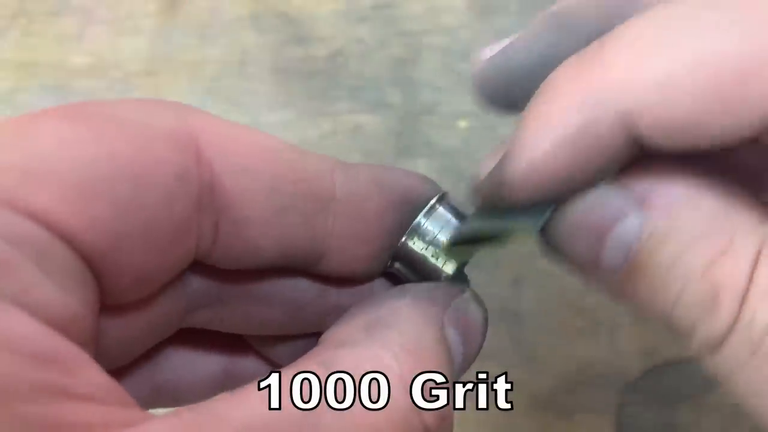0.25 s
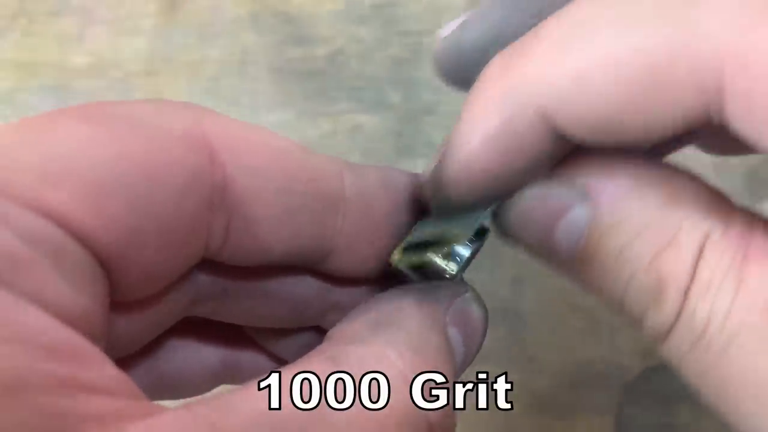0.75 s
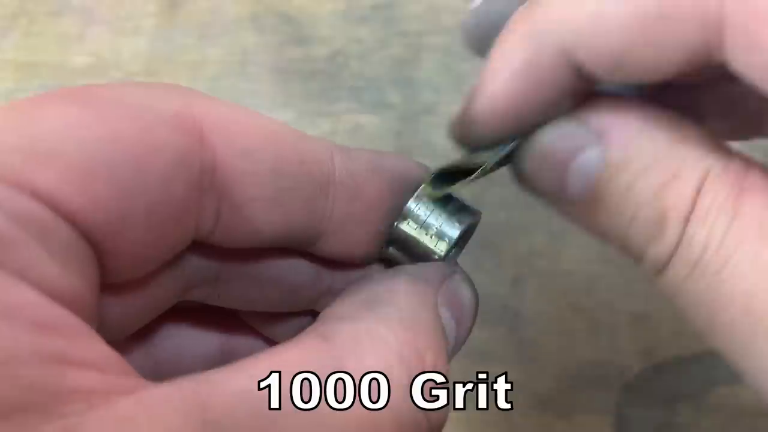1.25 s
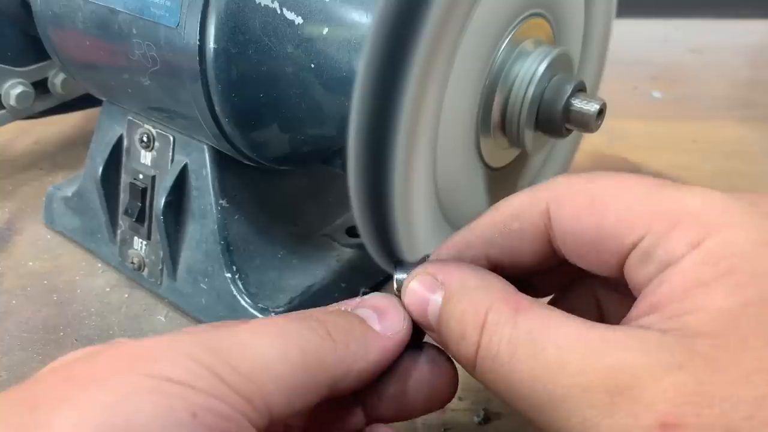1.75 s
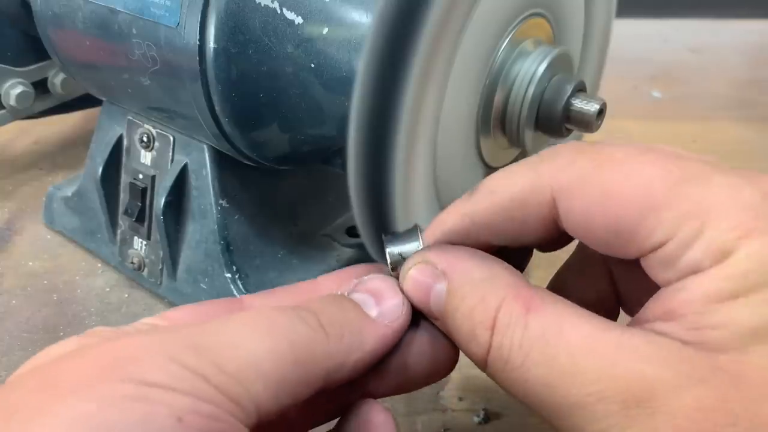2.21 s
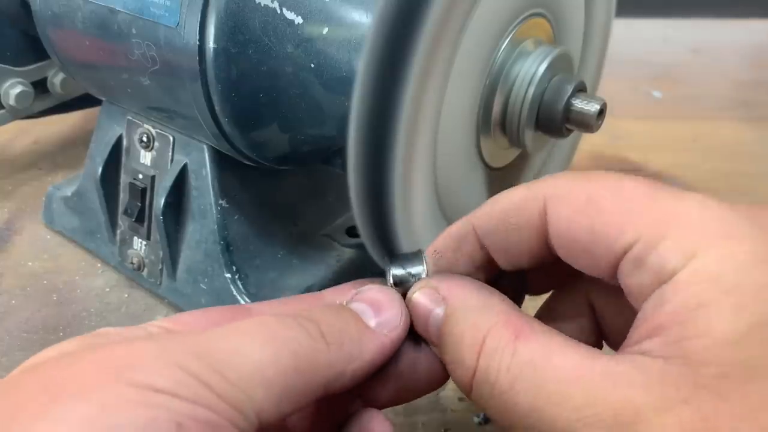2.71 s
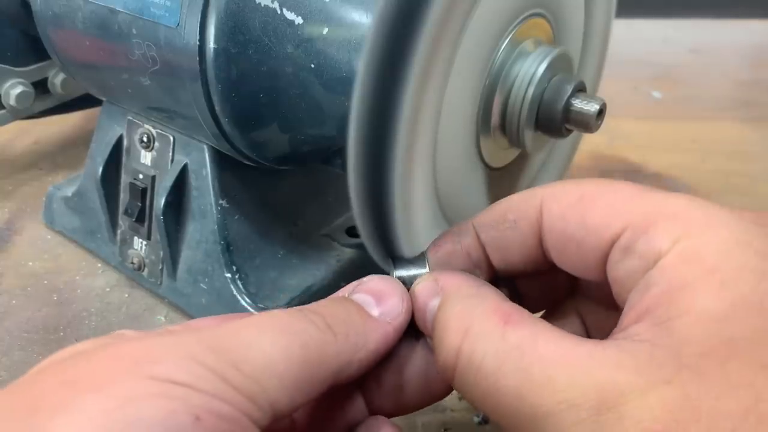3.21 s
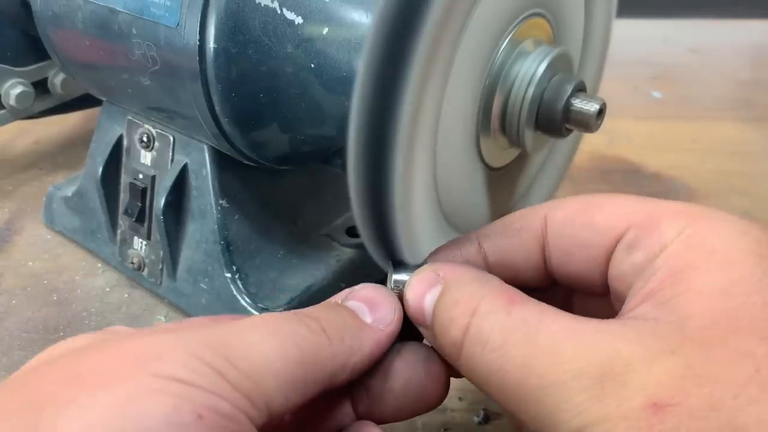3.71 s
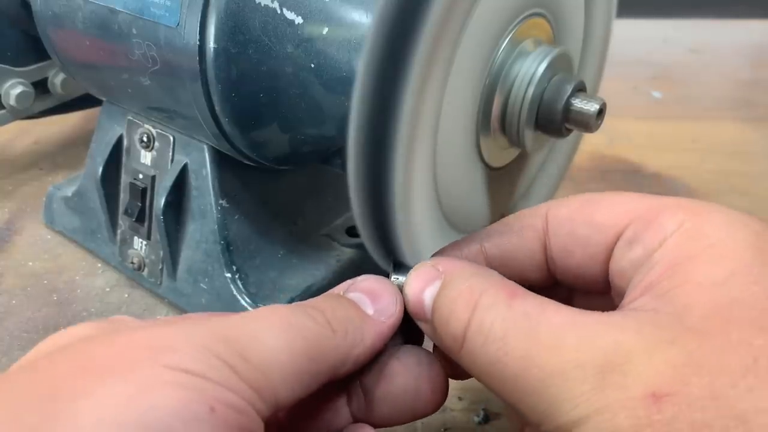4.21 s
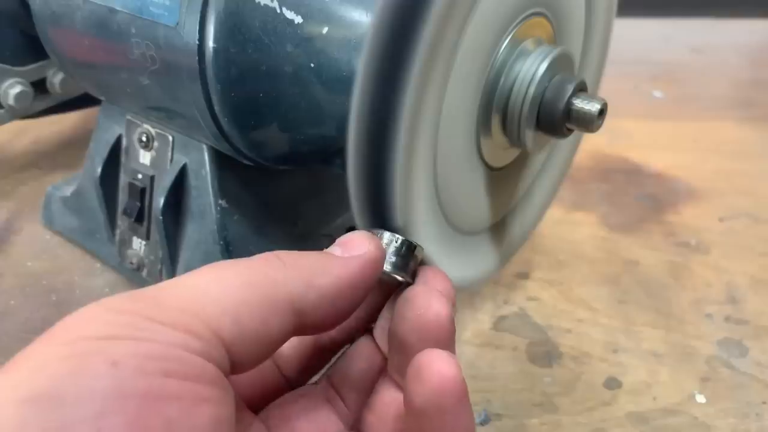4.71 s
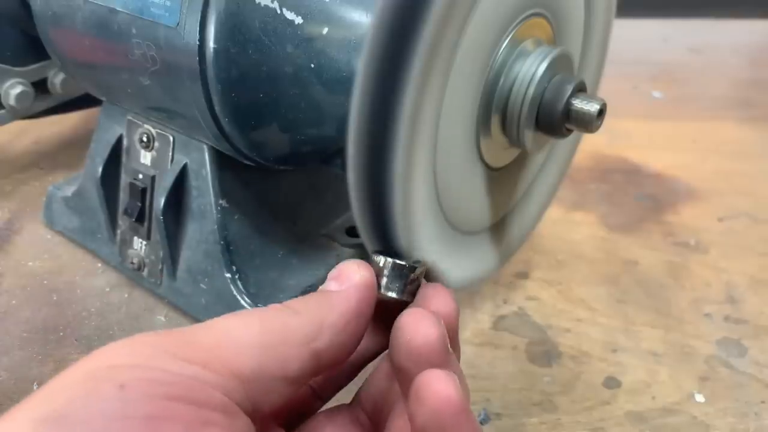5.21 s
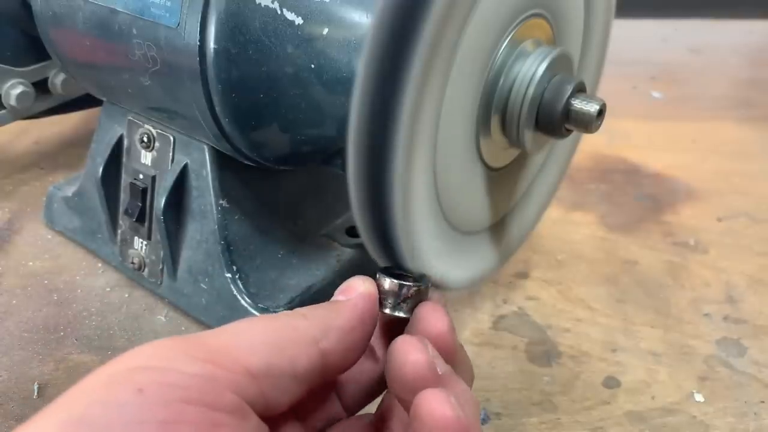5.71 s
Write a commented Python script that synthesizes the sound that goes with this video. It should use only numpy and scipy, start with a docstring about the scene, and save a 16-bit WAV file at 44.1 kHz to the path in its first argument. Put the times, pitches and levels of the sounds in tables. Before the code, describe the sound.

About fourteen short gritty rasps, seven or so back-and-forth pairs, are heard very close, with tiny gaps between them. Then, suddenly, a polishing wheel is running at full speed, with low drone, buzzing whine and rough airy friction of metal on cloth. The rubbing dips briefly, recovers, then jumps at a second cut and gradually lightens while the motor keeps humming. Stereo, close and dry, no speech.

```python
"""First a small steel ring is rubbed with fine sandpaper in quick strokes, shaped grit noise over a throbbing hum.
Then, in two passages, it is pressed against the cloth wheel of a running bench grinder: noise that nearly
repeats on every turn makes the rub and whirr, and shaft-locked sines the whine.
The motor adds shaft and mains tones, and slows under load. Two microphone ports hear it all with a phase between."""
import sys
import numpy as np
from scipy import signal
from scipy.fft import rfft, irfft
from scipy.io import wavfile
from scipy.ndimage import uniform_filter1d, map_coordinates

SR = 44100
rng = np.random.default_rng(int(sys.argv[2]) if len(sys.argv) > 2 else 0)


def unload_wav(signal):
    """Save mono or channel-first audio to the path in sys.argv[1] as 16-bit WAV at rate SR, clipped to [-1, 1]."""
    wavfile.write(
        sys.argv[1],
        SR,
        np.round(np.clip(np.atleast_2d(signal).T, -1, 1) * 32767).astype(np.int16),
    )


N = 262395
TIME, HZ = np.arange(N) / SR, np.maximum(np.fft.rfftfreq(N, 1 / SR), 1)

# Onsets of the two grinder passages: start_s
GRINDER_STARTS = [1.539, 4.623]
# Pressing of ring on wheel, per passage: time_s, rub_level_db (before a fixed trim of -2.5 dB)
CONTACT = [
    [(1.54, -41), (1.7, -35.5), (2.1, -34), (2.3, -35.5), (2.4, -39.5), (2.52, -48), (2.6, -42.5),
     (2.68, -46), (2.76, -41.5), (2.9, -39), (3.2, -36.5), (3.45, -36), (3.6, -36.5), (3.75, -35.5),
     (3.95, -36), (4.22, -34), (4.42, -36), (4.52, -37.5), (4.62, -52.5)],
    [(4.63, -33.5), (4.86, -31.5), (4.99, -34), (5.23, -33), (5.62, -36.5), (5.75, -35.5), (5.85, -38),
     (5.95, -38)],
]
# Drifting colour of the rub, per passage: time_s, low_lift_db, high_lift_db
RUB_TILT = [
    [(1.54, 6.5, 5), (1.8, -1, 1.5), (2.6, 6, 4), (3.1, 4, 2), (3.6, 2, 2), (4.3, -0.5, 2), (4.62, 6, 4)],
    [(4.63, 6, 2.5), (5.25, 4, 4), (5.6, -1, -1), (5.95, -8, -0.5)],
]
# Wheel speed, lower under load, per passage: time_s, turns_per_s
SPEED = [
    [(1.66, 59.33), (1.81, 59.04), (1.96, 58.92), (2.11, 58.87), (2.26, 59.05), (2.41, 59.23),
     (2.56, 59.32), (2.71, 59.38), (2.86, 59.47), (3.01, 59.38), (3.16, 59.24), (3.31, 59.11),
     (3.46, 58.98), (3.61, 59.03), (3.76, 59.0), (3.91, 58.75), (4.06, 58.68), (4.21, 58.76), (4.36, 58.78),
     (4.51, 58.86)],
    [(4.74, 59.29), (4.84, 59.26), (4.94, 59.29), (5.04, 59.36), (5.14, 59.23), (5.24, 59.15), (5.34, 59.2),
     (5.44, 59.26), (5.54, 59.35), (5.64, 59.4), (5.74, 59.38), (5.84, 59.44)],
]
# Sound that comes round again on the next turn: frequency_hz, share (0-1)
REPEATS = [(300, 0.073), (1000, 0.57), (2500, 0.66), (5000, 0.71), (7000, 0.77), (9500, 0.84),
           (15000, 0.16)]
# Lasting unevenness of the rim, per passage: order (multiple of the turn rate), then level_db (rms a side) in
# each of three grips, left_lead_rad, left_minus_right_db
WHINE = [
    [(15, -64, -65, -57, 0.1, 6), (16, -52, -52, -52, 0.1, 2), (17, -58, -58, -53, 0.6, 5),
     (18, -58, -55, -53, 1.2, 3), (23, -56, -55, -52, 0.8, 1), (26, -65, -60, -57, 0.9, 5),
     (27, -56, -58, -57, 0.4, 7), (29, -61, -57, -55, 0.5, 2), (30, -62, -62, -58, -0.0, 0),
     (31, -54, -53, -48, 0.8, 1), (33, -52, -54, -56, 0.4, -2), (36, -51, -51, -50, 1.5, 2),
     (37, -51, -52, -57, 0.8, -2), (38, -55, -55, -60, 1.1, -2), (39, -52, -55, -61, 0.8, -1),
     (40, -50, -54, -49, 2.8, -3), (47, -48, -51, -51, -3.0, 3), (49, -51, -49, -52, 2.5, 0),
     (51, -47, -51, -49, 1.4, 2), (52, -47, -51, -47, 1.7, 0), (54, -53, -57, -49, 1.8, -1),
     (58, -48, -48, -49, -2.6, -1), (59, -58, -62, -54, 0.0, 0), (61, -54, -54, -51, -2.1, -1),
     (62, -52, -55, -54, -2.0, 0), (70, -59, -60, -51, -0.8, 3), (72, -65, -61, -51, -1.7, -2),
     (79, -51, -52, -58, -1.6, -3), (93, -53, -55, -61, -0.9, -1), (95, -50, -53, -53, -2.0, 0),
     (108, -58, -58, -54, -0.3, 3), (115, -55, -64, -52, 0.1, -5), (116, -52, -62, -62, 0.1, -3),
     (118, -53, -54, -54, -0.8, -1)],
    [(23, -53, -54, -55, 0.3, 5), (27, -63, -56, -58, 0.0, 8), (29, -57, -59, -61, -0.1, 6),
     (31, -57, -56, -61, 0.9, 6), (50, -52, -54, -57, -0.1, 2), (59, -53, -55, -53, -0.1, -1),
     (60, -53, -54, -51, -0.1, 0), (62, -53, -54, -55, -0.3, 0), (69, -57, -53, -64, 0.1, -1),
     (70, -52, -54, -56, 0.9, -3), (73, -49, -50, -64, 1.2, -1), (77, -54, -54, -54, 0.9, -3),
     (94, -58, -60, -56, 0.6, -12), (95, -51, -57, -57, 1.5, -12), (102, -57, -55, -58, 1.2, -14),
     (105, -49, -58, -60, 2.0, -5), (106, -52, -50, -52, 2.0, -6), (107, -45, -54, -55, 1.7, -2),
     (109, -45, -52, -51, 1.4, -3), (110, -46, -53, -57, 1.4, -4), (111, -47, -51, -59, 1.5, -2),
     (113, -51, -55, -54, 1.5, 1), (114, -48, -57, -48, 1.3, 1), (115, -44, -45, -51, 1.2, -1),
     (116, -48, -49, -49, 0.8, 0), (119, -51, -53, -51, 1.2, 9), (122, -55, -60, -60, -0.0, 9),
     (125, -51, -52, -53, -1.1, 5), (129, -49, -50, -55, -1.3, 0), (132, -59, -49, -58, -1.7, 3)],
]
# Middles of the three grips, per passage: time_s
GRIPS = [(2.0, 3.3, 4.1), (4.83, 5.27, 5.74)]
# Tones tied to the shaft: order (multiple of the turn rate), passage_1_db (rms), passage_2_db (rms);
# orders above 3 have these levels at the rub level LOAD_AT_DB
SHAFT = [(1, -32.6, -32.4), (2, -48, -50), (2.63, -49.5, -49.5), (3, -51, -49.5), (4, -51, -57),
         (5, -62, -68), (6, -61, -66), (9, -62, -62)]
# Magnetic hum at multiples of the mains: frequency_hz, passage_1_db (rms), passage_2_db (rms)
MAINS = [(120, -47, -45), (240, -53, -58), (360, -66, -68), (480, -57.5, -46), (600, -54, -54),
         (840, -64, -66)]
# Sandpaper strokes, pull and push in turn: start_s, length_s, bite_level_db, low_lift_db, end_swell_db
STROKES = [(0, 0.05, -48, -6, -1), (0.057, 0.093, -45.5, 2.5, 3), (0.163, .1, -49.5, 2.5, 3),
           (0.283, 0.097, -43.5, 3, -3), (0.398, 0.081, -47.5, 2, 1.5), (0.491, 0.1, -44, -1, 0),
           (0.619, 0.075, -48, 0.5, 3), (0.722, 0.085, -46, 4, 2.5), (0.837, 0.078, -48, 1, 2.5),
           (0.944, 0.092, -46, 1, 1), (1.065, 0.079, -46, -0.5, 0), (1.17, 0.085, -45, 1, 1),
           (1.28, 0.084, -48, -1.5, 1), (1.389, 0.091, -46.5, 0.5, 3.5), (1.512, 0.04, -47.5, 3.5, -1)]
# Paper brushing the ring before some strokes: start_s, level_db (it climbs from 11 dB below to 1 dB above)
BRUSHES = [(.268, -71), (.48, -62), (.594, -64), (.927, -66), (1.158, -60)]
# Resonances of ring, fingers and paper, for sanding and each grinder passage: frequency_hz, width_hz, lift_db
RINGING = [
    [(3200, 400, 3), (3620, 120, -4), (4150, 300, 4), (4600, 200, -6), (5000, 300, 2), (5600, 200, -4),
     (6100, 300, 2), (7500, 500, 3), (10100, 500, 3), (12500, 500, 3)],
    [(1360, 80, 1), (1820, 150, 2), (2150, 200, 2), (2600, 400, 2), (3550, 200, 2), (4150, 250, 3),
     (7250, 250, 3), (9300, 300, 2), (12700, 400, 2), (15200, 900, 4)],
    [(1360, 80, 4), (1850, 200, 3), (2650, 400, 3), (3530, 200, 4), (6400, 300, 2), (6830, 200, 3),
     (7400, 300, 3), (9200, 400, 3), (15200, 900, 4)],
]
# Phase between the ports, for sanding and each grinder passage: frequency_hz, left_lead_rad
PORTS = [
    [(0, 0), (1600, 1.2), (3600, 1.6), (4000, 0), (4400, -.7), (5000, 1.5), (5500, -1.2), (6000, 1),
     (7000, .7), (8600, -3.14), (16000, -17.67)],
    [(0, 0), (350, 0), (550, 1.1), (950, .4), (2150, 1.3), (2400, 2.9), (2900, 2.8), (3050, 1.6), (3300, 2),
     (3450, 3.7), (4000, 4.2), (5500, 4.3), (6500, 6), (7100, 6), (8600, 3.14), (16000, -11.39)],
    [(0, 0), (350, 0), (600, .3), (1550, .5), (1900, 1.4), (2350, 1.9), (2600, 3.1), (2750, 2.7), (2950, 0),
     (3650, -.2), (4200, .6), (5200, 2), (6200, 1.5), (7000, 1), (7400, -.7), (8600, -3.14),
     (16000, -17.67)],
]
# Colour and stereo image of each source (the rub has one per passage): frequency_hz,
# density_db (per Hz, relative), left_right_likeness (0-1), left_minus_right_db
RUB_COLOUR = [
    [(280, -5, 0.84, 0), (650, -6.5, 0.45, 5.5), (970, -1.5, 0.81, 0.5), (1480, -6.5, 0.35, -1),
     (2140, -4, 0.61, 3), (3050, 2.5, 0.47, -0.5), (4400, -2, 0.27, 0.5), (5170, 1.5, 0.1, -1),
     (5670, -1.5, 0.27, -1), (6200, -0.5, 0.27, -1), (8400, 0.5, 0.95, 1), (10140, -4, 1, -1.5),
     (14100, -2, 1, 0.5), (16100, -22.5, 1, -4.5)],
    [(300, -11, 0.8, 8), (670, -10, 0.69, 4), (970, -12, 0.62, -3), (1530, -8, 0.45, 4),
     (2230, -6.5, 0.94, 1.5), (3080, -3.5, 0.57, 2), (4120, -2, 0.96, -1), (5100, 2.5, 0.46, -0.5),
     (6100, 4, 0.68, -6), (7340, 1, 0.65, 3), (8580, 6, 1, -0.5), (10700, -6.5, 1, -0.5),
     (13100, -2.5, 1, 0), (15600, -8, 1, 0)],
]
WHIRR_COLOUR = [(302, -14, 0.9, 5), (724, 1, 0.41, 2), (1040, -1.5, 0.7, 12), (1330, 0, 0.4, 1.5),
                (1920, 0.5, 0.41, 4), (2380, -0.5, 0.37, -1), (3080, -11, 0.91, 6), (3540, 1.5, 0.25, 4),
                (3970, 0, 0.1, 4), (4960, -0.5, 0.18, -3), (5730, -8, 0.2, 1), (7100, -11, 0.45, 4),
                (9000, -11.5, 0.72, 8), (10400, 1, 1, 2), (12960, 1, 1, -1), (15000, -16, 1, -1)]
RUMBLE_COLOUR = [(45, -9, 0.82, 0), (113, -9, 0.71, -1), (400, -21, 0.86, 1), (920, -27.5, 0.84, 0.75)]
SANDING_COLOUR = [(706, -11.5, 0.7, 3), (1510, -20.5, 0.9, 5), (2000, -14.5, 0, 8), (3200, -2.5, 0.7, -1.5),
                  (4130, -4, 0.86, -0.5), (5200, -5, 0, -1.5), (6200, -2.5, 0.4, -1), (7800, -2.5, 0.26, 1),
                  (8500, 1.5, 0.87, 0.5), (10900, 1, 0.94, 0.5), (11800, 0, 1, -1), (13800, -3.5, 1, 0),
                  (16200, 3, 1, 0.5)]
ROOM_COLOUR = [(25, -18, .95, -6), (45.3, -13, 0.87, 12), (62, -12, 0.61, 0), (72, -12.5, 0.83, 0),
               (123, -13.5, 0.78, -5), (137, -25, 1, 6), (250, -32, 0.78, -2), (393, -34.5, .7, 0),
               (590, -43, 0.37, 2), (1000, -42.5, 0.61, 5), (1600, -47, 0.59, 3), (5000, -46.5, .4, 1),
               (15000, -42, .8, 6)]

WHIRR_DB, RUMBLE_DB, ROOM_DB = -45.5, -47, -61.5
SECTIONS = 4   # stitched sections of the cloth wheel
FIBRES = 746   # points round the rim
# level of the whine against the rub: dB per dB, reached at this multiple of the turn rate
WHINE_FOLLOWS, FULL_ORDER = 1.3, 31
# higher multiples bunch later, in turns per multiple; random phase, in cycles
BUNCH_LAG, WHINE_SCATTER = .011, .55
# upper shaft tones grow with the rub: dB per dB, from this rub level
LOAD_FOLLOWS, LOAD_AT_DB = 0.7, -34
# mains tone shifted up by the turn rate; dB rms per passage, at the rub level LOAD_AT_DB
SIDEBAND_HZ, SIDEBAND_DB = 480, (-55, -53.5)
PULL_RISE_S, PUSH_RISE_S, BRUSH_RISE_S = 0.015, 0.0031, 0.0027
PULL_LEAD_S, PUSH_LEAD_S, STOP_S = 0.016, .002, 0.0082
REST_DB = -80
# level mid-stroke and near its end against the bite, in dB, before the stroke's own swell
PULL_SAG_DB, PUSH_SAG_DB = (1.5, -2.5), (-2, -5)
THROB_HZ, THROB_PEAK_S = 4.04, 0.433
CUTOFF_HZ = 15710


def grinder(passage):
    """Superposition: rub, whine, whirr, rumble and motor add, most of them sharing one shaft angle."""
    rub_db, = in_time(CONTACT[passage])
    turns = np.cumsum(in_time(SPEED[passage])[0]) / SR
    rub = wheel_rub(turns, rub_db, passage)
    idle = whirr(turns) + rumble()
    return rub + idle + motor(turns, rub_db, passage) + whine(turns, rub_db, passage)


def wheel_rub(turns, rub_db, passage):
    """Friction excitation: the passing rim drives the resonances of the held ring."""
    low_db, high_db = in_time(RUB_TILT[passage])
    lasting = [int(row[0]) for row in WHINE[passage]]
    rub = rim(turns, memory=0.96, seam_db=0.3, lasting=lasting)
    rub = resonant(rub, RINGING[passage + 1], patchy_db=1.5, patch_s=0.57)
    rub = heard(rub, RUB_COLOUR[passage], PORTS[passage + 1])
    rub = lifted(rub, low_db, high_db, low_hz=2230, high_hz=7500)
    return from_db(rub_db - 2.5 + 0.99 * drift(5)) * rub


def rim(turns, memory, seam_db, lasting=()):
    """Cyclic repetition: cloth fibres pass once a turn, changing a little each time; fresh hiss fills the rest."""
    fibres = rng.standard_normal((2, int(turns[-1]) + 42, FIBRES))
    keep = np.clip(memory, 0, .99)
    fibres = signal.lfilter([np.sqrt(1 - keep ** 2)], [1, -keep], fibres, axis=1)
    fibres = fibres[:, 40:]   # drop the turns in which the memory settles
    orders = rfft(fibres)
    orders[..., list(lasting)] = 0   # these multiples sound as the whine
    fibres = irfft(orders, FIBRES).reshape(2, -1)
    fine = signal.resample_poly(fibres, 2, 1, axis=1)
    passing = [map_coordinates(side, [turns * FIBRES * 2], order=3) for side in fine]
    share = np.clip(in_hz(REPEATS)[0], 0, 1)
    repeated = np.sqrt(share) * rfft(passing)
    fresh = np.sqrt(1 - share) * rfft(rng.standard_normal((2, N)))
    rub = irfft(repeated + fresh, N)
    # out of true, the wheel bears harder once and twice a turn, and at each stitched section
    runout = np.cos(2 * np.pi * turns) + 0.38 * np.cos(4 * np.pi * turns + 1)
    runout = runout + 1.4 * np.cos(2 * np.pi * SECTIONS * turns)
    return rub * from_db(seam_db * runout)


def whine(turns, rub_db, passage):
    """Harmonic series of rotation: neighbouring multiples bunch once a turn and rattle; grip shifts their balance."""
    out, side, time = 0, np.array([[.5], [-.5]]), TIME[::16]   # levels move on every 16th sample
    wavers = [drift(2.0)[::16] for _ in range(6)]
    grips_s = GRIPS[passage]
    # rub level against its course between the grips
    pressed_db = rub_db[::16] - np.interp(time, grips_s, np.interp(grips_s, TIME, rub_db))
    for order, *grip_db, lead, lean_db in WHINE[passage]:
        db = np.interp(time, grips_s, grip_db) + .7 * rng.standard_normal(6) @ wavers
        db = db + WHINE_FOLLOWS * min(order / FULL_ORDER, 1) * pressed_db
        cycles = order * (turns - BUNCH_LAG * order / 2) + WHINE_SCATTER * rng.random()
        wave = np.sin(2 * np.pi * cycles + lead * side)
        out = out + from_db(lean_db * side) * np.repeat(from_db(db), 16)[:N] * wave
    return np.sqrt(2) * out


def motor(turns, rub_db, passage):
    """Forced vibration: unbalance and bearings follow the shaft, upper tones the load; magnetic hum keeps to the mains."""
    load_db = LOAD_FOLLOWS * (rub_db - LOAD_AT_DB)
    # each tone: cycles, level in dB rms, waver in dB
    tones = [(turns * order, db[passage] + load_db * (order > 3), 1.4 if order > 1 else .4)
             for order, *db in SHAFT]
    tones += [(TIME * hz, db[passage], .6) for hz, *db in MAINS]
    tones += [(TIME * SIDEBAND_HZ + turns, SIDEBAND_DB[passage] + load_db / 2, 2.4)]
    out = 0
    for cycles, db, waver_db in tones:
        mean_hz = cycles[-1] / TIME[-1]
        # radians each side of the middle
        lead = 0.13 + np.interp(mean_hz, *np.transpose(PORTS[passage + 1])) / 2
        wave = np.sin(2 * np.pi * (cycles + rng.random()) + lead * np.array([[1], [-1]]))
        out = out + from_db(db + waver_db * drift(8.5)) * wave
    return np.sqrt(2) * out


def whirr(turns):
    """Cyclic repetition: the free wheel whirrs as its fibres pass, at a level independent of the ring."""
    return from_db(WHIRR_DB) * heard(rim(turns, memory=0.854, seam_db=0.5), WHIRR_COLOUR, PORTS[1])


def rumble():
    """Broadband noise: steady random vibration, weighted to the lows."""
    return from_db(RUMBLE_DB) * heard(rng.standard_normal((2, N)), RUMBLE_COLOUR, PORTS[1])


def sanding():
    """Abrasive friction: uneven grit sounds under each stroke; pushes bite at once and sag, pulls swell."""
    level_db, low_db = stroke_levels()
    high_db = 2.3 * (np.clip(level_db, -56, -46.0) + 47.5)   # a stronger stroke is brighter
    grain_db = 2.3 * np.minimum(rng.exponential(1, N), 5)
    grit = rng.standard_normal((2, N)) * from_db(grain_db)
    grit = resonant(grit, RINGING[0], patchy_db=3.3, patch_s=0.058)
    scratch = heard(grit, SANDING_COLOUR, PORTS[0])
    scratch = lifted(scratch, low_db, high_db, low_hz=5500, high_hz=6500)
    return from_db(level_db + 0.51 * drift(70)) * scratch


def stroke_levels():
    """Amplitude envelope: each stroke rises, sags or swells and stops, and the hand rests between strokes."""
    points = []
    for k, (s, length, db, low_db, swell_db) in enumerate(STROKES):
        if k % 2:
            rise, lead, sag_db = PUSH_RISE_S, PUSH_LEAD_S, PUSH_SAG_DB
        else:
            rise, lead, sag_db = PULL_RISE_S, PULL_LEAD_S, PULL_SAG_DB
        points += [(s - lead, REST_DB, low_db), (s - lead + rise, db, low_db),
                   (s + length / 2, db + sag_db[0] + swell_db / 2, low_db),
                   (s + length - STOP_S, db + sag_db[1] + swell_db, low_db),
                   (s + length + 1.14 * STOP_S, REST_DB, low_db)]
    level_db, low_db = in_time(points[1:])   # the first stroke is already under way
    for s, db in BRUSHES:   # held until the stroke takes over
        next_s = min(start for start, *_ in STROKES if start > s)
        held = (TIME > s) & (TIME < next_s)
        brush_db = db - 11 + 12 * np.minimum((TIME - s) / BRUSH_RISE_S, 1)
        level_db = np.where(held, np.maximum(level_db, brush_db), level_db)
    return level_db, low_db


def workshop():
    """Amplitude modulation: a low hum of wavering pitch throbs over a faint noise floor."""
    throb = 1 + 0.59 * np.cos(2 * np.pi * THROB_HZ * (TIME - THROB_PEAK_S))
    cycles = np.cumsum(57.5 + 1.8 * drift(3.1)) / SR   # pitch in Hz
    hum = from_db(-56.0 + 2.0 * drift(5.1)) * throb * np.sin(2 * np.pi * cycles)
    return hum + from_db(ROOM_DB) * heard(rng.standard_normal((2, N)), ROOM_COLOUR, PORTS[0])


def resonant(x, peaks, patchy_db, patch_s):
    """Resonance: fixed peaks and dips, and patches of the spectrum that swell and fade as the grip shifts."""
    lift_db = sum(db / (1 + (2 * (HZ - hz) / width_hz) ** 2) for hz, width_hz, db in peaks)
    ringing = irfft(rfft(x) * from_db(lift_db), N)
    frames = signal.stft(ringing, nperseg=256)[2]
    patches = rng.standard_normal(frames.shape[1:])
    span = max(int(patch_s * SR / 128), 1)   # in frames of 128 samples
    for _ in range(2):
        patches = uniform_filter1d(patches, size=span, axis=1)
    patches = uniform_filter1d(patches, size=2, axis=0)
    frames = frames * from_db(patchy_db * patches / patches.std())
    return signal.istft(frames, nperseg=256)[1][:, :N]


def heard(pair, colour, ports):
    """Partial coherence: two unrelated sources become a coloured stereo pair whose side mean has rms 1."""
    level_db, alike, lean_db = in_hz(colour)
    alike = np.clip(alike, 0, 1)
    low_close = 1 + (1.17 * colour[0][0] / HZ) ** 4   # closed below the table
    common, apart = rfft(pair) * from_db(level_db) / low_close
    turn = from_db(lean_db / 2) * np.exp(.5j * np.interp(HZ, *np.transpose(ports)))
    common, apart = np.sqrt(1 + alike) * common, np.sqrt(1 - alike) * apart
    out = irfft([(common + apart) * turn, (common - apart) / turn], N)
    return out / out.mean(axis=0).std()


def lifted(x, low_db, high_db, low_hz, high_hz):
    """Shelving: the lows and the highs are raised or lowered over time."""
    low = signal.sosfilt(signal.butter(2, low_hz, fs=SR, output="sos"), x)
    high = signal.sosfilt(signal.butter(2, high_hz, "high", fs=SR, output="sos"), x)
    return x + (from_db(low_db) - 1) * low + (from_db(high_db) - 1) * high


def drift(rate_hz):
    """Low-passed chance: a slow random course of standard deviation 1."""
    slow = irfft(rfft(rng.standard_normal(N)) / (1 + (HZ / rate_hz) ** 2), N)
    return slow / slow.std()


def in_time(rows):
    """Linear interpolation: each column of a table joined by straight lines in time."""
    s, *columns = np.transpose(rows)
    return [np.interp(TIME, s, c) for c in columns]


def in_hz(rows):
    """Logarithmic pitch: each column of a table interpolated on a log-frequency axis."""
    hz, *columns = np.transpose(rows)
    return [np.interp(np.log(HZ), np.log(hz), c) for c in columns]


def from_db(db):
    """Decibel law: amplitude gain of a level in dB."""
    return 10 ** (np.asarray(db) / 20)


def scene():
    """Linear crossfading: sanding in the workshop, then two grinder passages, joined by fades of 1.8 ms."""
    first, second = (np.clip((TIME - s) / 0.0018, 0, 1) for s in GRINDER_STARTS)
    by_hand = (1 - first) * (sanding() + workshop())
    return by_hand + (first - second) * grinder(0) + second * grinder(1)


def record(dry):
    """Band limiting: an elliptic low-pass cuts the top steeply."""
    return signal.sosfilt(signal.ellip(14, .1, 80, CUTOFF_HZ, fs=SR, output="sos"), dry)


dry = scene()
out = record(dry)
unload_wav(out)
```